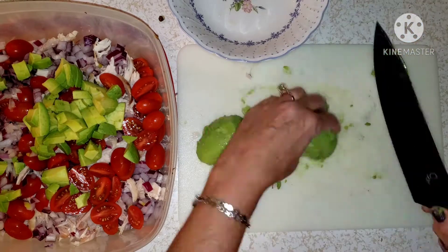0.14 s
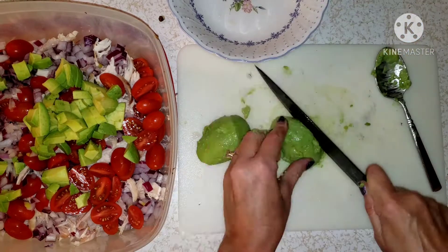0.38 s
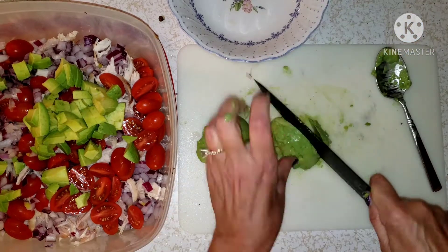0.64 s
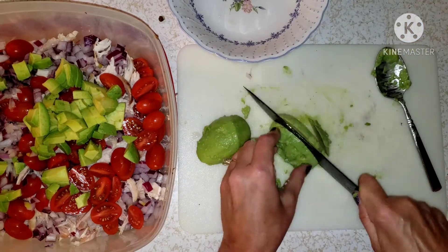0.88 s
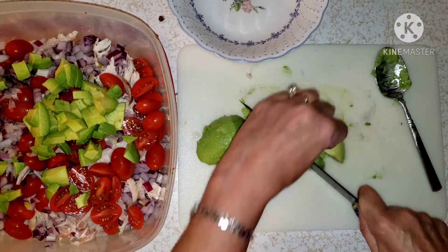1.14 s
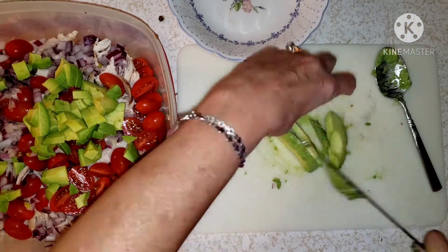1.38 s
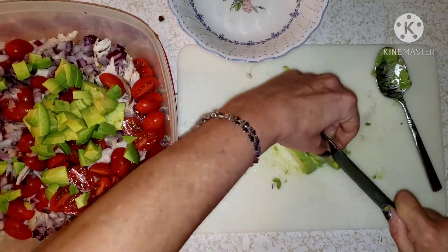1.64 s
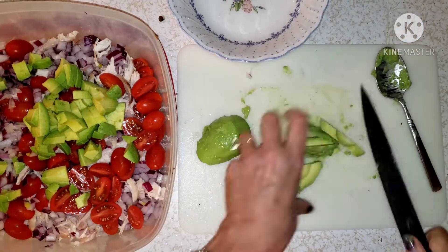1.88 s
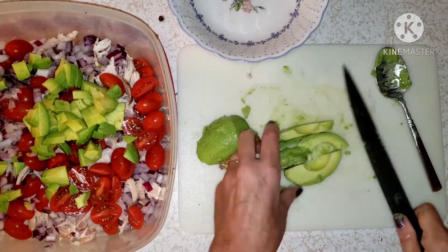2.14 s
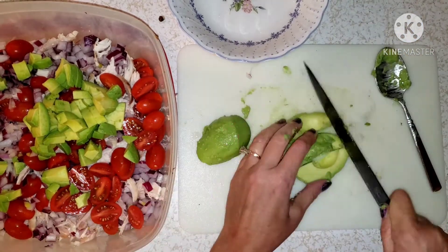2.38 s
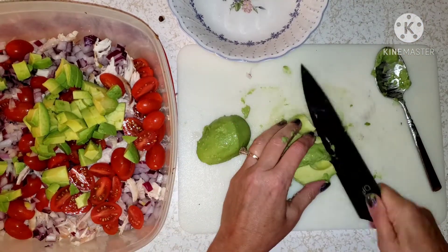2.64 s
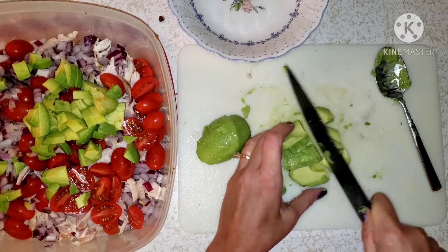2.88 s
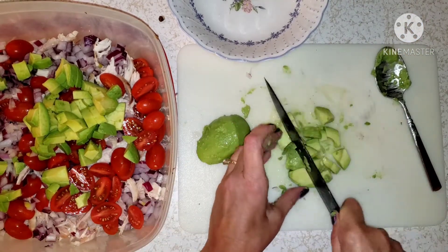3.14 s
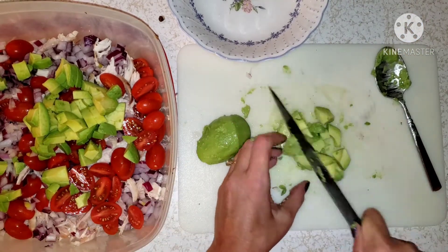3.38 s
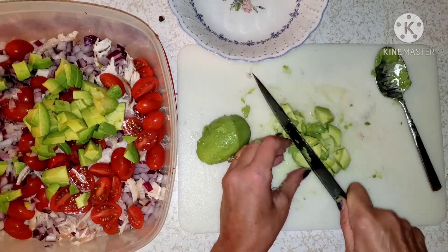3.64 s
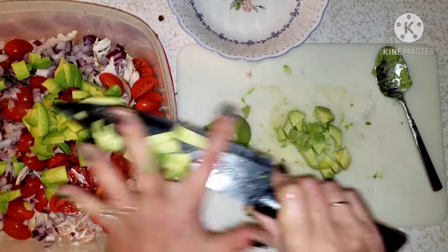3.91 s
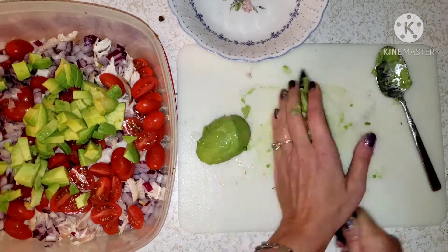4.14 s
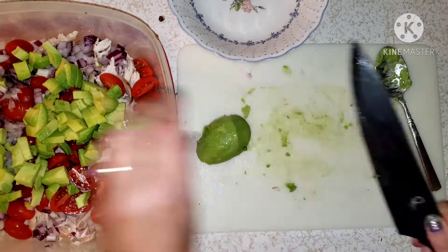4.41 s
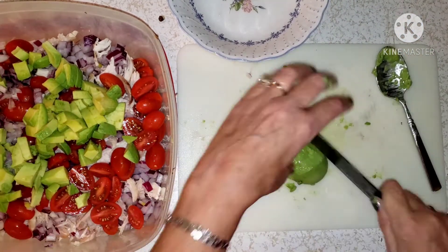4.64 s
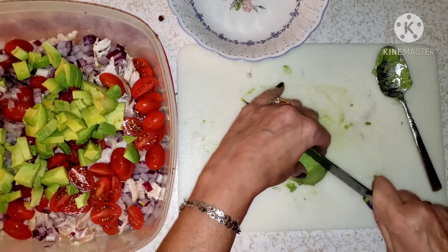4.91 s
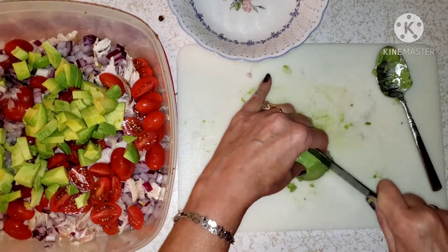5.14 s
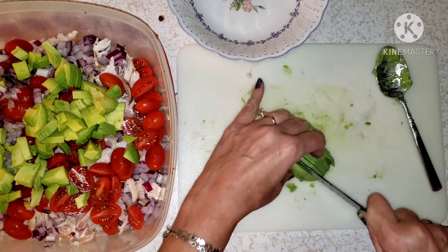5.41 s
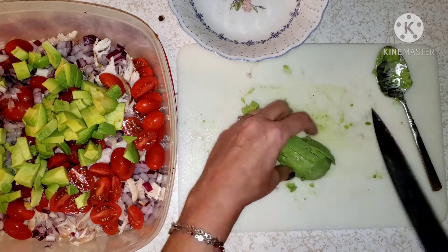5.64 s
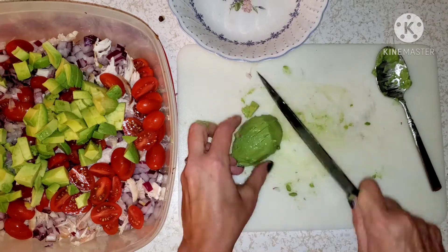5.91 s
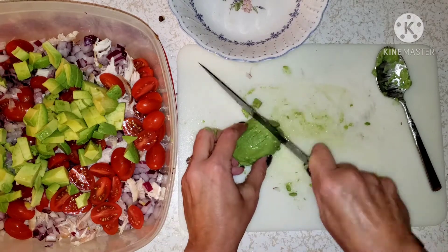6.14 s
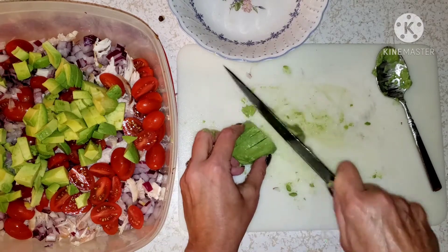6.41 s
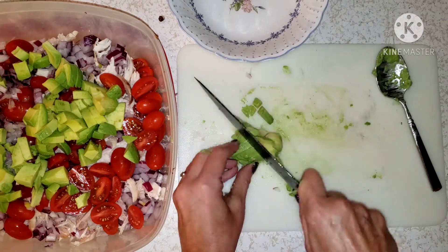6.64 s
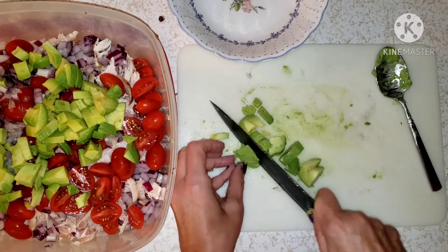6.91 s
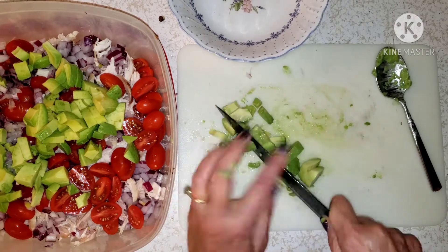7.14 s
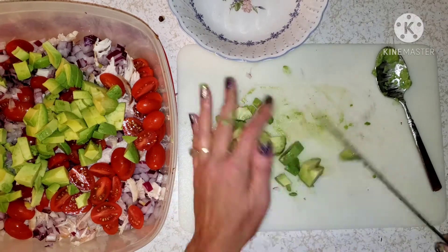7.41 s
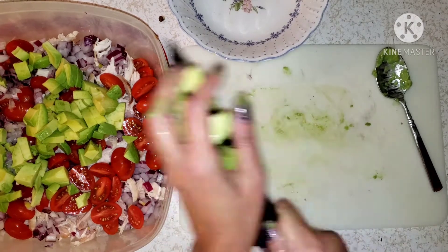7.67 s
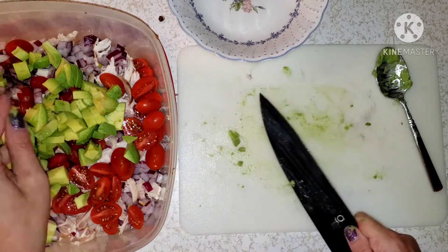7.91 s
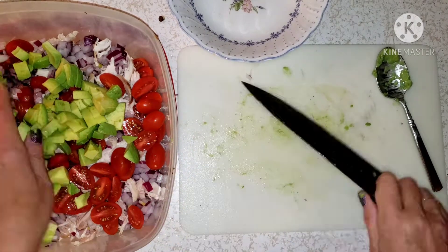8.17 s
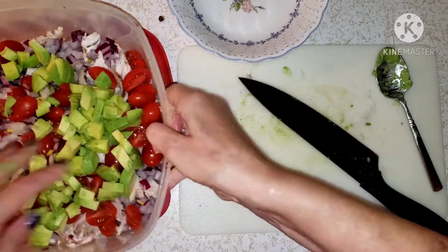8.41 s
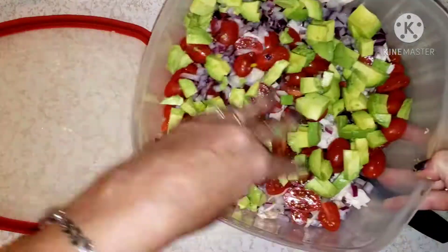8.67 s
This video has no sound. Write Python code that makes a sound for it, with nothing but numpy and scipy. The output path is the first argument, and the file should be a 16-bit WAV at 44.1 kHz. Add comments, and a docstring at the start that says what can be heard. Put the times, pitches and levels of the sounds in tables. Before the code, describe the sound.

Close up in a small kitchen, a steel knife chops soft fruit on a plastic board. The first tap carries a small steel clink; sharp taps follow, then a lull of soft touches, more taps, scraping, a quick run and a few scattered taps. Wet fruit smacks faintly between blows, over a low appliance hum and airy fan whir.

```python
"""In a small kitchen an appliance hums and its fan whirs: a wavering tone, shaped noise and flickering hiss.
A steel knife dices soft fruit on a plastic board under a phone: sharp taps from the start, the first with
a steel clink, then softer touches, more taps, a quick run from about 5 s and scattered taps at the end.
Taps are noise cracks with ringing board tones. In between, the blade scrapes, hands bump the board and wet
fruit and fingers smack: grainy noise for scrapes and smacks, low board tones for bumps. A smack comes last.
"""
import sys
import numpy as np
from scipy import signal
from scipy.fft import rfft, irfft, next_fast_len
from scipy.io import wavfile
from scipy.ndimage import map_coordinates

SR = 44100
rng = np.random.default_rng(int(sys.argv[2]) if len(sys.argv) > 2 else 0)


def ratio(d):
    """dB to gain"""
    e = np.asarray(d, float) / 20
    return 10 ** e


def materialize(psi):
    """Save the field psi as 16-bit PCM at rate SR to the path in sys.argv[1].

    A 1-D psi becomes a single channel; in a 2-D psi each row is a channel.
    """
    bounded = np.clip(np.atleast_2d(psi).T, -1, 1)
    quanta = np.round(bounded * 32767).astype(np.int16)
    wavfile.write(sys.argv[1], SR, quanta)


N = 387638

# The whole background swells and sinks. Each row: time in seconds, hum level in dB.
BACKGROUND_LEVEL = [(0.0, -51), (0.25, -54), (1.25, -56.5), (1.68, -54), (1.8, -50), (2.3, -53.5),
                    (3.0, -55.5), (3.6, -54), (3.95, -55), (4.7, -52), (5.1, -56), (5.7, -55),
                    (6.05, -53.5), (6.9, -59), (7.38, -53), (7.5, -52), (8.22, -51), (8.36, -57),
                    (8.79, -57)]
# Colour of the fan noise. Each row: frequency in Hz, relative level in dB per Hz.
FAN_COLOUR = [(20, -24.5), (54, -7), (68, -12.5), (140, -17), (200, 2), (300, -7), (470, -13), (700, -8.5),
              (1400, -13.5), (1800, -16), (2600, -27), (5000, -100)]
# Resonances of the fan's duct. Each row: frequency in Hz, width in Hz, boost in dB.
DUCT_RESONANCES = [(569.4, 37, 7.8), (776, 12, 9.8), (957, 33, 11.5), (1087, 43, 9.6), (1126.7, 25, 10.9),
                   (1237, 76, 9.3), (1538, 47, 11.1)]
# Colour of the background hiss. Each row: frequency in Hz, relative level in dB per Hz.
TREBLE_COLOUR = [(1060, -27), (1800, -25), (2560, 4.5), (3740, 2.5), (4990, 0), (8010, -4.5), (13600, 2.5),
                 (15600, 0.5), (16500, -38)]
# How alike left and right are in the background. Each row: frequency in Hz, likeness from 0 to 1.
BACKGROUND_LIKENESS = [(60, 0.84), (1400, 0.94), (3100, 0), (15000, 0.2)]
# How long the kitchen rings. Each row: frequency in Hz, seconds to fall by 60 dB.
KITCHEN_DECAY = [(200, 0.15), (600, 0.068), (1400, 0.11), (4000, .1), (10000, 0.1)]

# Hands bumping the board. Each row: start in seconds, level in dB.
BUMP_EVENTS = [(1.335, -36), (2.023, -38), (2.146, -29), (2.748, -44), (4.133, -36)]
# Blade and fingers sliding on the board. Each row: start in seconds, length in seconds, rasp level in dB,
# hiss in dB over the rasp, drag in dB over the rasp.
SLIDES = [(0, 0.031, -54.5, -2, -2), (0.483, 0.056, -60, 2, -12), (1.775, .045, -65, 6, 5),
          (4.106, 0.071, -41.5, -1.8, -16), (4.345, 0.024, -48.5, -12.5, -0.5), (4.463, .09, -61, -2.5, -8),
          (5.722, 0.061, -61, -13, -1), (5.85, 0.057, -52, -3, 3), (7.494, 0.1, -39.5, -3, -15),
          (7.873, 0.048, -58.5, -3, -4), (8.014, 0.049, -46, 1.5, -15)]
# Wet pieces and fingers parting. Each row: start in seconds, hiss level in dB, rasp in dB over the hiss.
WET_SMACKS = [(0.616, -52, -18), (1.169, -49, -14), (1.2054, -45.5, -10.5), (1.4149, -45, -24),
              (1.67, -54.5, -6), (2.0121, -47, -8), (2.1239, -56.5, -7), (3.292, -59.5, -13),
              (3.324, -55.5, -5), (3.594, -60, -16), (4.4228, -58, -3), (5.434, -49.5, -13),
              (7.04, -55, -26), (7.127, -65, 5), (7.144, -56, -18), (7.243, -63, -14), (7.3168, -48.5, -23),
              (7.7288, -56, -19), (8.6035, -52, -6.5)]
# Colour of the rasp of sliding. Each row: frequency in Hz, relative level in dB per Hz.
RASP_COLOUR = [(1060, -24), (1800, -16.5), (2650, -24), (2930, -8), (4450, -10), (5300, -10), (6890, -16.5),
               (8000, -15), (10400, -45), (17600, -120)]
# Colour of the hiss of sliding. Each row: frequency in Hz, relative level in dB per Hz.
HISS_COLOUR = [(4410, -31), (7500, -16), (8120, -10.5), (12300, -5), (15000, -10), (16000, -34)]
# The board rattling under a pressed blade. Each row: frequency in Hz, relative level in dB per Hz.
DRAG_COLOUR = [(500, -40), (900, 0), (1300, -5), (2000, -4.5), (2700, -11), (4000, -40)]

# Steel touching steel. Each row: start in seconds, level in dB.
CLINK_EVENTS = [(.066, -26.5), (8.206, -46)]
# Tones of free steel. Each row: frequency in Hz, relative level in dB, seconds to fall by 60 dB.
STEEL_MODES = [(620, -13.5, 0.035), (782, 8.5, 0.021), (910, -3.5, 0.028), (3470, -2, 0.028),
               (5240, -5, 0.08), (8650, -5, 0.11), (9850, 1, 0.055), (12650, -2, 0.091)]
# Tones that ring out when a blow lands; most belong to the struck board and blade, while the short, strong ones
# near 4.1-4.9 kHz lend every blow a bright colour. Each row: typical frequency in Hz, typical relative level in
# dB, # seconds to fall by 60 dB.
BOARD_MODES = [(227.4, -0.5, 0.027), (350, 7.5, 0.0097), (800, -5, 0.028), (1465, -9.5, 0.033),
               (2067, 0, 0.012), (2395, -5.5, 0.026), (3055, -16, 0.055), (3570, -37, 0.0074),
               (3817, -9.5, 0.012), (4114, 7, 0.0068), (4870, 7, 0.0053), (4360, 2.5, 0.0032),
               (5730, -21, 0.028), (6320, -7, 0.024), (8390, -3, 0.016), (9600, -8, 0.052),
               (12660, -12, 0.013)]
# Blade meeting board; a flat, heavy landing has weight, a bare edge is keen. Each row: time in seconds,
# level in dB, weight in dB, keenness in dB.
TAP_EVENTS = [(0.0647, -12.5, 1.5, 5), (0.4147, -10, 0.5, -1.5), (0.6729, -8, 0, 1),
              (0.871, -8.5, 0.5, 4.5), (1.105, -7, -3.5, -2), (1.703, -35.5, 16, -18), (1.898, -41, 14, -3),
              (1.9085, -30, 14.5, 1.5), (2.1777, -16.5, 5.5, -7), (2.2555, -10.5, 3, -1),
              (2.4439, -6.5, -4, -1), (2.588, -8, -3, -2.5), (2.7762, -9, -0.5, -1), (2.9856, -8.5, 0, 0),
              (3.1766, -9, 0, 2.5), (3.6721, -8.5, -1.5, 2), (4.0832, -23.5, 11.5, -2.5),
              (4.35, -30, 10, -15), (4.358, -22, -1, -32), (4.47, -42, 25, -3), (4.7715, -8.5, 0.5, 1.5),
              (4.9795, -6.5, -2, 0.5), (5.2943, -7.5, -1, 3), (5.4973, -12.5, -2, -6.5), (5.689, -12, 2, 1),
              (5.842, -9, 2, -1.5), (6.031, -8, 1, 2.5), (6.178, -10, 3, 6), (6.3588, -10, 2.5, 4.5),
              (6.5258, -9, 3, 7), (6.6901, -10, 0.5, 3.5), (6.784, -53, 33, 8), (6.86, -12, 3.5, 3.5),
              (7.0654, -24, 3, -2), (7.4811, -15.5, 9, -1), (7.8213, -37, 18, -19),
              (7.9986, -32.5, 17.5, 1), (8.204, -15, 5, 4), (8.2409, -13, 6.5, 9), (8.318, -39.5, 6, 2)]
# Thud, knock, clack, tap and edge of one blow. Each row: lowest Hz, highest Hz, energy in dB over the
# tap's level, size of the left-right difference, dB gained per dB of weight.
BLOW_BANDS = [(194.6, 480, -4.5, 0.32, 1.0246), (586, 1196, -6, 0.23, 1.03), (1213, 2270, -2.5, 0.46, 0.62),
              (2500, 6320, 8.5, 0.95, 0), (7040, 14100, 2, 1.02, 0)]
# The board and the kitchen are stronger on the right. Each row: gain of one microphone, left then right.
MICROPHONE_GAINS = [
    [.89],
    [1.12],
]

HUM_HZ = 235.1
FAN_DB, TREBLE_DB, FLICKER_DB = -2.5, -11.5, -13  # fan over hum, hiss over hum, flicker over hiss
PRESS_S, LIFT_S, SMACK_T60 = 0.011, 0.029, 0.11  # s: pressing on, letting go, a smack falling by 60 dB
LEAD_IN = 0.003  # s the edge hisses through the last of the fruit


def unit(x):
    """Scales a sound to an average strength (rms) of 1."""
    return x / np.sqrt(np.mean(x ** 2) + 1e-20)


def along(points, hz):
    """Reads a table of (Hz, value) between its points, on a log pitch axis."""
    f, v = np.transpose(points)
    return np.interp(np.log(hz + 1), np.log(f + 1), v)


def wobble(rate):
    """A smooth random curve with this many knots a second."""
    knots = rng.standard_normal(int(N * rate / SR) + 4)
    return map_coordinates(knots, [np.arange(N) * rate / SR])


def filtered(x, response):
    """Shapes the spectrum of x with a function of frequency."""
    m = next_fast_len(x.shape[-1] + 4096)
    spectrum = rfft(x, m) * response(np.fft.rfftfreq(m, 1 / SR))
    return irfft(spectrum, m)[..., :x.shape[-1]]


def rush(colour_db, likeness):
    """Stereo noise of rms 1: shared noise plus a left-right difference sets how alike the sides are."""
    def response(hz):
        turn = np.arccos(np.clip(along(likeness, hz), 0, 1)) / 2
        return ratio(colour_db(hz)) * [np.cos(turn), np.sin(turn)]

    mid, side = filtered(rng.standard_normal((2, N)), response)
    return unit(np.array([mid + side, mid - side]))


def ring(modes, t, scatter_db, detune, spread=.0001):
    """Dying tones with new strengths and pitches each time, a little different at each microphone."""
    hz, db, t60 = np.transpose(modes)[:, :, None]
    hz = hz * (1 + detune * rng.standard_normal(hz.shape))
    size = ratio(db + scatter_db * rng.standard_normal(hz.shape) - 60 * t / t60)
    apart = spread * hz * rng.standard_normal((2,) + hz.shape)  # phase difference grows with pitch
    return np.sum(size * np.sin(2 * np.pi * hz * t + apart), axis=1)


def kitchen(x, wet_db):
    """Adds the room's answer: a fresh noise tail per ear, each frequency dying at its own speed."""
    hz, t, z = signal.stft(rng.standard_normal((2, SR // 8)), SR, nperseg=128)
    decay = ratio(-60 * t / along(KITCHEN_DECAY, hz)[:, None])
    tail = signal.istft(z * decay, SR, nperseg=128)[1]
    tail *= 1 - np.exp(-np.arange(tail.shape[1]) / SR / 0.00037)  # soft start
    tail /= np.linalg.norm(tail[0])
    return x + ratio(wet_db) * signal.fftconvolve(x, tail, axes=1)[:, :x.shape[1]]


def room_tone():
    """A wavering hum, fan noise coloured by a duct, and hiss in which faint rustles flicker."""
    seconds, level_db = np.transpose(BACKGROUND_LEVEL)
    hum_db = np.interp(np.arange(N) / SR, seconds, level_db)
    treble_db = hum_db + TREBLE_DB

    phase = 2 * np.pi * HUM_HZ * np.arange(N) / SR + 0.15 * wobble(22)
    side = np.array([[1], [-1]])  # left, right
    lean = ratio(-.5 * side)  # the hum leans a little further to the right
    hum = np.sqrt(2) * lean * ratio(hum_db + 0.46 * wobble(28)) * np.sin(phase - .12 * side)

    def fan_colour(hz):
        duct = sum(db / (1 + (2 * (hz - centre) / width) ** 2) for centre, width, db in DUCT_RESONANCES)
        return along(FAN_COLOUR, hz) + duct

    fan = ratio(hum_db + FAN_DB) * rush(fan_colour, BACKGROUND_LIKENESS)
    treble = ratio(treble_db) * rush(lambda hz: along(TREBLE_COLOUR, hz), BACKGROUND_LIKENESS)
    flicker_level = ratio(treble_db + FLICKER_DB + 5 * wobble(45))
    flicker = flicker_level * rush(lambda hz: along(HISS_COLOUR, hz), [(8000, .3)])
    return hum + fan + treble + flicker


def bumps():
    """A soft push by a hand wakes only the two lowest tones of the board."""
    out, t = np.zeros((2, N + SR)), np.arange(SR // 10) / SR
    for s, db in BUMP_EVENTS:
        push = (1 - np.exp(-t / 0.0062)) * ring(BOARD_MODES[:2], t, scatter_db=0.5, detune=.05)
        out[:, round(s * SR):][:, :len(t)] += ratio(db) * push
    return out[:, :N]


def scrapes_and_smacks():
    """Sliding and wet parting are dense grains of friction: a rasp and a hiss, and in slides a low drag."""
    grain = ratio(2 * wobble(900) + 2 * wobble(200) + 1.5 * wobble(50))
    rasp = rush(lambda hz: along(RASP_COLOUR, hz), [(2000, 0.68), (8000, 0.14)])
    hiss = rush(lambda hz: along(HISS_COLOUR, hz), [(8000, 0.14)])
    drag = rush(lambda hz: along(DRAG_COLOUR, hz), [(1000, .9)])
    noises = np.array([unit(grain * noise) for noise in (rasp, hiss, drag)])

    levels, t = np.zeros((3, N + SR)), np.arange(SR // 4) / SR
    for s, length, db, hiss_db, drag_db in SLIDES:
        press = np.minimum(t / PRESS_S, 1) ** 2
        lift = np.exp(-np.maximum(t - length + LIFT_S, 0) ** 2 / LIFT_S ** 2)
        strengths = ratio([[db], [db + hiss_db], [db + drag_db]])
        levels[:, max(round(s * SR), 0):][:, :len(t)] += strengths * press * lift
    for s, db, rasp_db in WET_SMACKS:
        strengths = ratio([[db + rasp_db], [db]])
        levels[:2, round(s * SR):][:, :len(t)] += strengths * ratio(-60 * t / SMACK_T60)
    return np.sum(levels[:, None, :N] * noises, axis=0)


def clinks():
    """Undamped steel rings on after the blow and wakes the kitchen a little."""
    out, t = np.zeros((2, N + SR)), np.arange(SR // 5) / SR
    for s, db in CLINK_EVENTS:
        onset = 1 - np.exp(-(t / .0015) ** 2)
        steel = onset * ring(STEEL_MODES, t, scatter_db=1, detune=0, spread=.00004)
        out[:, round(s * SR):][:, :len(t)] += ratio(db) * kitchen(steel, wet_db=-15.5)
    return out[:, :N]


def band(x, low_hz, high_hz, apart):
    """One frequency band of a blow, with energy 1 at each microphone."""
    y = signal.sosfilt(signal.butter(4, [low_hz, high_hz], "band", fs=SR, output="sos"), x)
    shared = y.mean(axis=0)
    y = shared + apart * (y - shared)  # long waves reach both microphones alike
    return y / np.linalg.norm(y, axis=1, keepdims=True)


def taps():
    """The edge meets the board: a crack, short ringing, and a colour set by where and how it lands."""
    out, t = np.zeros((2, N + SR)), np.arange(SR // 6) / SR - LEAD_IN  # contact is at t = 0
    for s, db, weight_db, keen_db in TAP_EVENTS:
        strike_db = np.where(t < 0, -24 + 60 * t / 0.022, -60 * t / 0.011)
        shared_noise = .5 * rng.standard_normal(len(t))
        crack = ratio(strike_db) * (shared_noise + rng.standard_normal((2, len(t))))
        ringing = (t > 0) * ring(BOARD_MODES, t, scatter_db=4.5, detune=0.017)
        blow = kitchen(ringing + 5.3 * crack, wet_db=-3)

        *body, edge = [ratio(energy_db + share * weight_db) * band(blow, low, high, apart)
                       for low, high, energy_db, apart, share in BLOW_BANDS]
        start = round((s + .001 - LEAD_IN) * SR)  # contact falls 1 ms after the listed time
        out[:, start:][:, :len(t)] += ratio(db) * (sum(body) + ratio(keen_db) * edge)
    return out[:, :N]


def scene():
    """Adds up all the sounds at the two microphones."""
    return MICROPHONE_GAINS * (room_tone() + bumps() + scrapes_and_smacks() + clinks() + taps())


def low_pass(x):
    """Removes everything above the highest recorded frequency."""
    return signal.sosfilt(signal.butter(12, 16800, fs=SR, output="sos"), x)


def record(dry):
    """The phone takes in the finished mix."""
    return low_pass(dry)


dry = scene()
out = record(dry)
materialize(out)
```